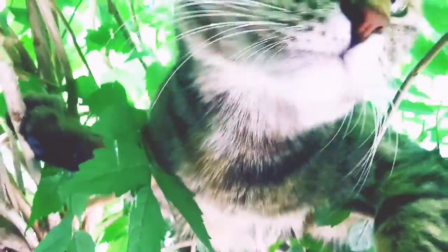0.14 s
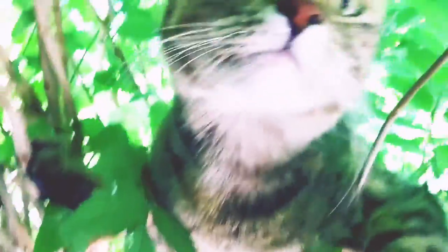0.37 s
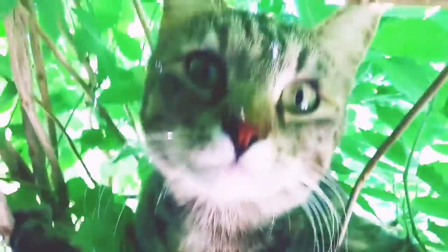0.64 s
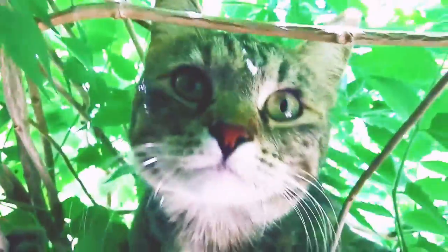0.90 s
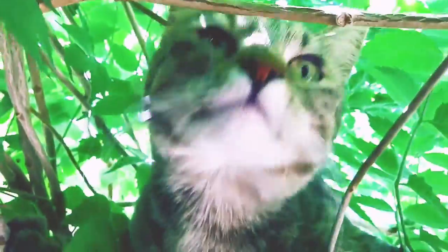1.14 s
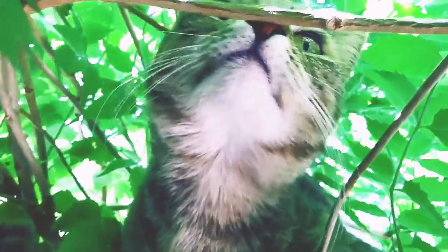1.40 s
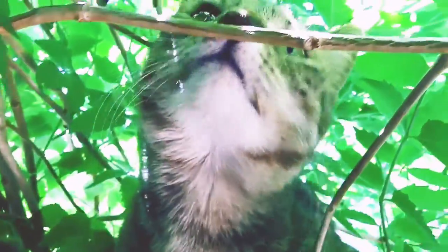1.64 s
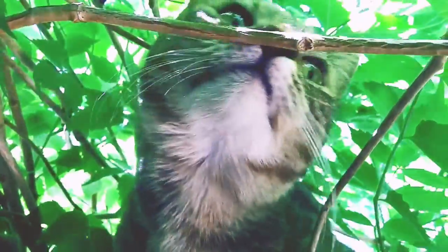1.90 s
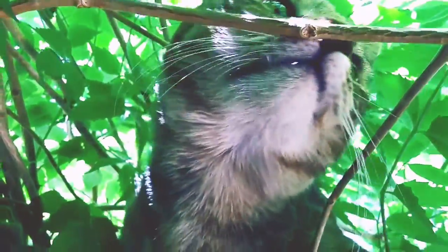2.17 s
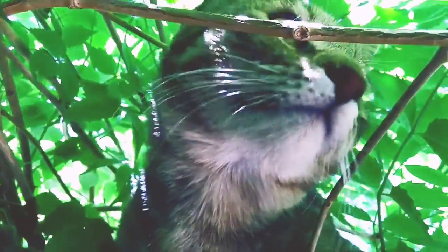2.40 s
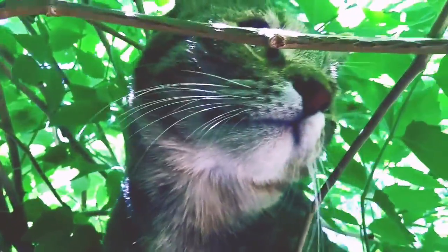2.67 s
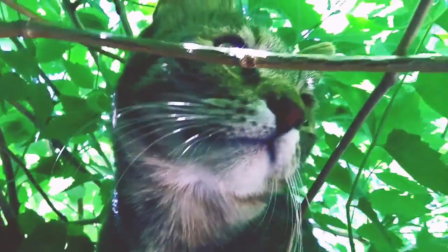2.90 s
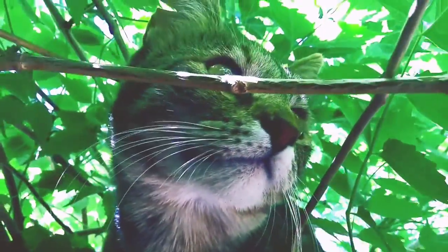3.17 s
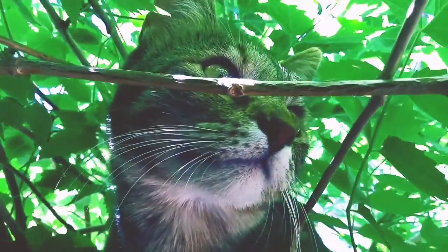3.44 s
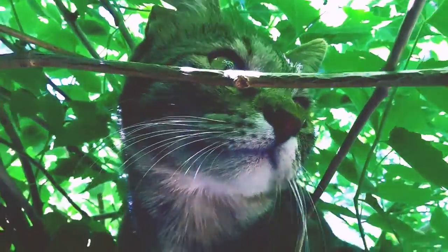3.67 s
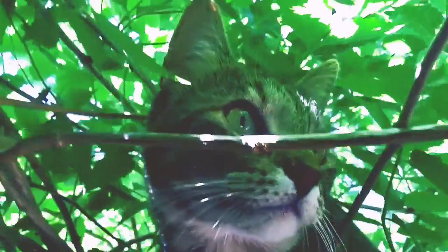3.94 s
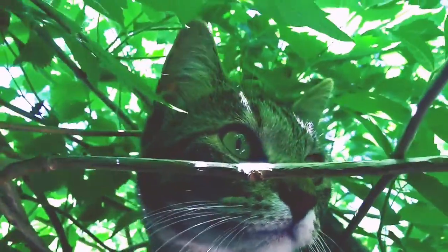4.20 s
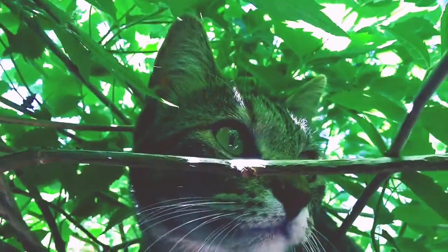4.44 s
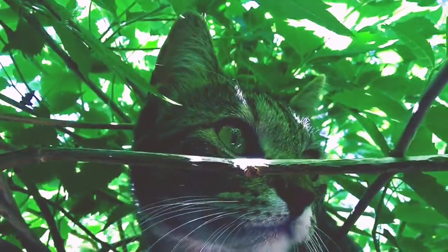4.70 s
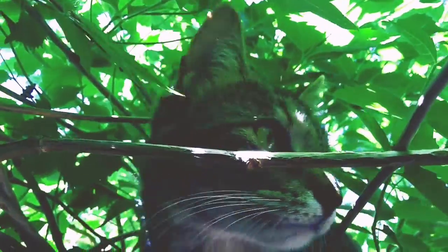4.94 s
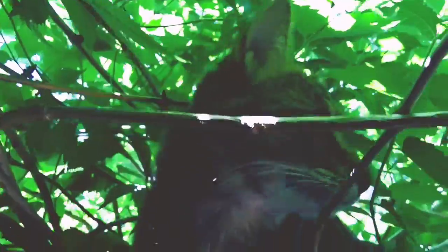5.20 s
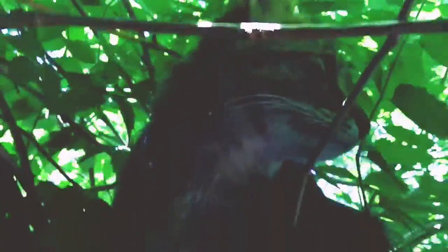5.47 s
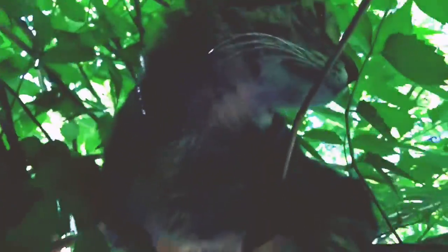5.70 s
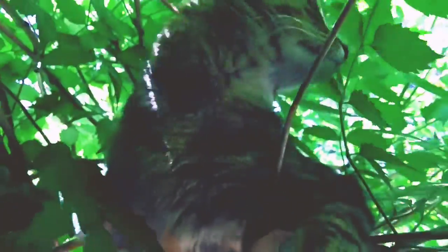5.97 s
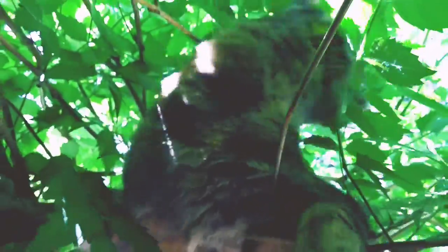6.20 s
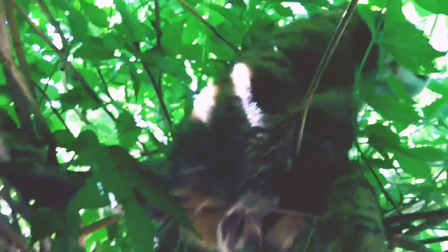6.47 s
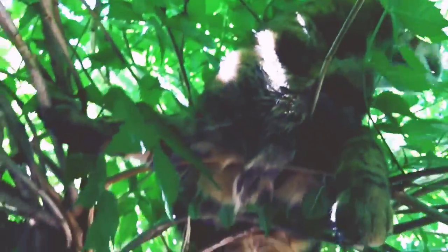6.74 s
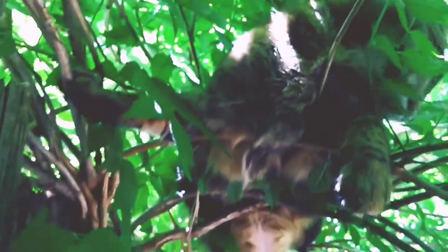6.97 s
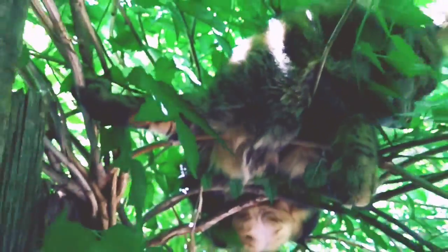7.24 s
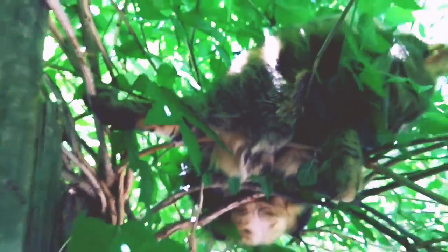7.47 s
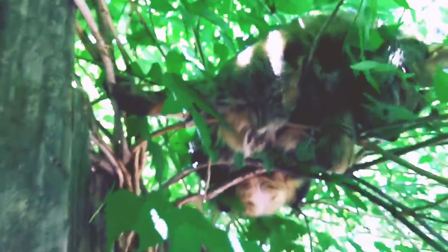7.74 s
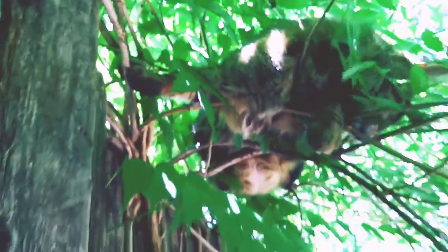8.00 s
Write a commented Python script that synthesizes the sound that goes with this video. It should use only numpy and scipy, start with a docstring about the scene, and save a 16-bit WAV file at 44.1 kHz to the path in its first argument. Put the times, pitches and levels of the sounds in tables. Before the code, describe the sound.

In a leafy garden with faint distant traffic, leaves rustle and a twig ticks close to the microphone as an animal shifts. A bird off to the left clucks, then whistles mellow low notes that flip upward like yodels and slide back, lightly echoed. Faint fuzzy chirps come from farther birds. The rustling grows after the song, and a very loud dry branch crack and splintering end it.

```python
"""A leafy garden over distant traffic: low engine tones waver under soft noise, and a thin insect buzz fades.
An animal shifts in a bush close by: noise makes leaves rustle, and ringing modes make twigs knock.
Soon a bird off to the left clucks and whistles: sines that flip up like a yodel and slide back, with echoes.
Fuzzy chirps, narrow bands of noise, come from far birds meanwhile. After the song the rustling grows.
At the end a dry branch cracks with hard knocks and goes on splintering in grainy noise."""
import sys
import numpy as np
from scipy import signal
from scipy.fft import rfft, irfft
from scipy.io import wavfile
from scipy.ndimage import uniform_filter1d

SR = 44100
rng = np.random.default_rng(int(sys.argv[2]) if len(sys.argv) > 2 else 0)


def transcribe(u):
    """Save the signal u as a 16-bit wav file named by the first command-line argument.

    u: samples, shape (n,) or (channels, n), limited to [-1, 1]; the rate is SR.
    q: integer samples, one column per channel.
    """
    v = np.clip(np.atleast_2d(u).T, -1, 1)
    q = np.round(v * 32767).astype(np.int16)
    wavfile.write(sys.argv[1], SR, q)


def natural_amplitude(level_db):
    """Convert a level in decibels to a linear amplitude factor, elementwise."""
    exponent = np.asarray(level_db, float) / 20
    return 10 ** exponent


N = 358091  # length in samples


def evened(x):
    """Scales a sound to an rms of 1."""
    return x / np.sqrt(np.mean(x ** 2) + 1e-20)


def read(points, hz):
    """Reads a table of (frequency, value) between its points, on a logarithmic frequency scale."""
    f, value = np.transpose(points)
    return np.interp(np.log(hz + 1), np.log(f + 1), value)


def curve(rows, t):
    """Joins the rows of a table by straight lines over time, one curve per column."""
    s, *columns = np.transpose(rows)
    return [np.interp(t, s, column) for column in columns]


def add(mix, s, sound):
    """Adds a short sound into the mix at s seconds, cut off where the mix ends."""
    part = mix[..., round(s * SR):][..., :sound.shape[-1]]
    part += sound[..., :part.shape[-1]]


def ports(left, right, lead, pan_db):
    """Two microphone ports: the right one hears later by lead samples, the left louder by pan_db."""
    n = np.arange(len(right))
    late_right = np.interp(n - lead, n, right)
    return np.array([left, late_right]) * natural_amplitude(np.array([[pan_db / 2], [-pan_db / 2]]))


def wander(rate_hz):
    """A random drift of rms 1: sines up to rate_hz with random phases, the slower ones stronger."""
    t = np.arange(N // 64 + 2) * 64 / SR
    slow = 0
    for f in np.geomspace(rate_hz / 20, rate_hz, 24):
        slow = slow + np.sin(2 * np.pi * (f * t + rng.random())) / np.sqrt(f)
    return np.interp(np.arange(N) / SR, t, evened(slow))


def noise(tone, patchy_db, size):
    """Noise of rms 1 in two ports: random short-time spectra, coloured by tone, with drifting patches."""
    # how alike the two ports are: hz, likeness (1 = same, 0 = unrelated, below 0 = opposed)
    likeness = [(60, 0.92), (180, 0.91), (550, 0.42), (1650, -0.18), (4970, 0.085), (15000, -0.054)]
    frames, hz = N * 4 // size + 5, np.fft.rfftfreq(size, 1 / SR)
    a, b, c, d, patches = rng.standard_normal((frames, len(hz), 5)).T
    patches = uniform_filter1d(patches, size=10, axis=0)
    patches = evened(uniform_filter1d(patches, size=10, axis=1))
    same = np.clip(read(likeness, hz), -1, 1)[:, None]
    left = a + 1j * b
    right = same * left + np.sqrt(1 - same ** 2) * (c + 1j * d)
    spectra = np.array([left, right]) * natural_amplitude(read(tone, hz)[:, None] + patchy_db * patches)
    return evened(signal.istft(spectra, nperseg=size, noverlap=size * 3 // 4)[1][:, :N])


def garden(x, t60, gap_s):
    """Walls and foliage scatter sound back: sparse taps of random sign that build over gap_s and die away."""
    taps = np.zeros((2, SR // 2))
    at = np.arange(0, SR // 2 - 20, 20) + rng.integers(0, 20, (2, SR // 40))
    np.put_along_axis(taps, at, rng.choice([-1., 1.], at.shape), 1)
    t = np.arange(SR // 2) / SR
    taps *= natural_amplitude(-60 * t / t60) * np.clip(t / gap_s, 0, 1)
    return signal.fftconvolve(x[None], taps / np.linalg.norm(taps[0]), axes=1)[:, :N]


def air():
    """The soft background: noise strongest in the bass, gently swelling."""
    # colour of the background: hz, level_db (per Hz, relative)
    air_tone = [(18, -34), (30, -23), (64, -11.5), (124, -10), (178, -9.5), (271, -10.5), (301, -11.5),
                (596, -16.5), (860, -16.5), (931, -19.5), (2460, -28), (3540, -29.5), (15800, -56)]
    level_db = -55.5 + 0.7 * wander(3)
    return natural_amplitude(level_db) * noise(air_tone, patchy_db=1.14, size=2048)


def engines():
    """Engines far away give low wavering tones at low orders of their firing rate, alike in both ports."""
    # a droning engine: start_s, pitch_hz, level_db (rms, before wavering)
    drone = [(0, 62.2, -67.5), (1.2, 51.3, -68), (1.5, 52, -102), (3.5, 55, -69), (3.9, 57.8, -57.5),
             (5.0, 60.6, -52.5), (5.45, 62.3, -55.5), (5.7, 55.6, -72)]
    # a higher hum: start_s, level_db (rms, before wavering)
    hum = [(0, -66.5), (1, -65), (2.1, -66), (3.1, -62), (4.6, -64.5), (8.12, -90)]
    # the order at half the pitch of the hum: start_s, level_db (rms)
    half_hum = [(1.6, -72), (2, -62), (3.3, -68), (4, -88)]
    t = np.arange(N) / SR
    drone_hz, drone_db = curve(drone, t)
    hum_db, half_db = curve(hum, t)[0], curve(half_hum, t)[0]
    hum_hz = 184 - 2.9 * t  # sags by 2.9 Hz each second
    hum_turns = np.cumsum(hum_hz * (1 + 0.012 * wander(13))) / SR
    drone_wave = np.sin(2 * np.pi * np.cumsum(drone_hz) / SR) * (t < drone[-1][0])
    out = natural_amplitude(drone_db + 0.95 * wander(3)) * drone_wave
    out += natural_amplitude(hum_db + 1.0 * wander(6.5)) * np.sin(2 * np.pi * hum_turns)
    out += natural_amplitude(half_db) * np.sin(np.pi * hum_turns) * (t < half_hum[-1][0])
    return np.sqrt(2) * out


def insect():
    """A thin, wavering tone, a narrow band of noise, that throbs with each wing stroke."""
    # loudness of the buzz: start_s, level_db (rms)
    buzz_levels = [(0, -75), (.5, -78.5), (1.4, -79), (1.7, -90.5), (4.6, -83.5), (5, -105)]
    pitch_hz, half_width_hz, strokes_hz = 9950, 160, 67
    t = np.arange(N) / SR
    edges_hz = [pitch_hz - half_width_hz, pitch_hz + half_width_hz]
    band = signal.butter(2, edges_hz, "band", fs=SR, output="sos")
    throb = (0.5 + 0.5 * np.cos(2 * np.pi * strokes_hz * (t - 0.138))) ** 2
    buzz = evened(signal.sosfilt(band, rng.standard_normal((2, N))) * throb)
    return buzz * natural_amplitude(curve(buzz_levels, t)[0]) * (t < buzz_levels[-1][0])


def far_birds():
    """Distance and foliage blur each chirp into a narrow band of noise around its gliding pitch."""
    # far chirps: start_s, length_s, first_hz, last_hz (glided towards), width_hz, level_db (rms, before fades)
    chirps = [(1.25, 0.092, 2480, 2500, 277, -65.5), (2.455, 0.27, 2570, 3600, 100.7, -67.5),
              (2.9, 0.19, 3600, 3530, 180, -69.5), (3.879, 0.12, 3350, 3650, 150, -71),
              (4.121, .12, 3370, 4140, 690, -63.5), (5.764, 0.08, 2790, 2740, 122, -61.5)]
    glide_s = 0.037
    out = np.zeros((2, N))
    for start, length, first_hz, last_hz, width_hz, db in chirps:
        t = np.arange(0, length, 1 / SR)
        hz = last_hz + (first_hz - last_hz) * np.exp(-t / glide_s)
        knots = 2 * width_hz * t  # the blur changes as fast as the band is wide
        a, b = ([np.interp(knots, np.arange(500), row) for row in rng.standard_normal((2, 500))]
                for _ in "ab")
        turn = 2 * np.pi * np.cumsum(hz) / SR
        chirp = evened(a * np.cos(turn) + b * np.sin(turn))
        add(out, start, natural_amplitude(db) * chirp * np.sin(np.pi * t / length) ** 0.29)
    return out


def leaves():
    """A fine hiss of rubbing leaves that flickers, with short swells of the same hiss on top."""
    # loudness of the hiss: start_s, level_db (rms, before flicker)
    hiss_levels = [(0, -65.5), (1.2, -67), (1.5, -73), (4, -72.5), (5.2, -73.5), (5.6, -62.5),
                   (6.05, -69.5), (6.6, -61), (7.5, -54.5), (7.85, -49.5), (8.12, -52)]
    # colour of the hiss: hz, level_db (relative)
    hiss_tone = [(700, 0), (1500, 1.5), (3000, 0), (5000, -3.5), (8000, -8.5), (11000, -7.5), (15000, -5),
                 (16000, -6.5)]
    # short swells of hiss, one of them a very brief treble tick: peak_s, level_db (rms at the peak),
    # tilt_db (treble tilt per octave above 2500 Hz), length_s (scale of the swell's length)
    hiss_swells = [(0.163, -57.5, 3, 0.0095), (0.491, -52, 1, 0.015), (0.79, -59, 4, 0.0089),
                   (0.905, -59, 6, 0.011), (1.059, -52.5, 6, 0.019), (1.69, -54.5, -8.5, 0.02),
                   (2.165, -55, -10, 0.021), (2.916, -72, 19, 0.043), (3.689, -64.5, -3, 0.024),
                   (3.735, -55, 13, 0.0027), (5.35, -60.5, 1.5, 0.092), (5.847, -66.5, 4, 0.088),
                   (6.565, -53, 10, 0.03), (6.825, -53.5, 2, 0.0058), (7.017, -56, 3, 0.0098),
                   (7.18, -52.5, 1.5, 0.022), (7.386, -50, -3, 0.0023), (7.464, -67, -1, 0.028)]
    t = np.arange(N) / SR
    hiss = noise(hiss_tone, patchy_db=2.0, size=256)
    flicker_db = 1.6 * wander(40)
    out = hiss * natural_amplitude(curve(hiss_levels, t)[0] + flicker_db)
    for s, db, tilt_db, length in hiss_swells:
        u = np.arange(-2 * length, 3 * length, 1 / SR) / length
        piece = hiss[:, round((s - 2 * length) * SR):][:, :len(u)]
        hz = np.fft.rfftfreq(len(u), 1 / SR)
        tilt = natural_amplitude(tilt_db * np.log2(np.maximum(hz, 2500) / 6000))
        piece = evened(irfft(rfft(piece) * tilt, len(u)))
        swell = np.exp(-np.where(u < 0, 1.38 * u, 0.9 * u) ** 2)  # rises faster than it falls
        add(out, s - 2 * length, natural_amplitude(db) * piece * swell)
    return out


def knocks():
    """Each blow starts the same modes, scaled by the size of the twig; a longer contact is duller."""
    # knocks of wood: start_s, level_db (peak, before pan and bass cut), pitch (factor on the modes),
    # ring (factor on their ringing time), pan_db (left minus right), contact_ms
    blows = [(0.0776, -25.5, 0.82, 0.21, 20, 0.37), (3.0329, -39.5, 1.73, 0.33, -16, 0.11),
             (4.2212, -28, 1.47, 0.19, -7, 0.39), (4.2415, -38, 0.69, 0.38, 14, 0.65),
             (4.2456, -35.5, 0.4, 3.6, -8, 1.5), (5.694, -38, 0.62, 0.12, 28, 0.88),
             (7.7916, -21, 0.72, 0.94, 9, 0.5), (7.841, -15.5, 0.87, 0.45, -12, 0.2),
             (7.8484, -19, 1.1, 0.7, -4, 0.5), (7.879, -30, 1.23, 1.4, 0.6, 0.4),
             (7.8935, 4, 0.987, 0.72, -1.3, 0.2), (7.898, -10.5, 0.97, 0.4, 16, 0.33),
             (7.9063, -23, 0.6, 1.4, 18, 0.31), (7.914, -15.5, 0.94, 0.45, -9, 1),
             (8.005, -22, 0.99, 0.36, -12, 0.28)]
    # what the wood rings with, before those factors: mode_hz, left_db, right_db, t60_s (time to fall 60 dB)
    modes = [(295, -37, -35, 0.067), (502, -34, -38, 0.01), (793, -21.5, -21.5, 0.17),
             (1060, 1, -14, 0.029), (1750, 0, -12, 0.0088), (2360, -32, 4.5, 0.0057),
             (3600, 2, -35, 0.0042), (5200, -7, -7, 0.0047)]
    lead = 6.3  # samples by which the left port hears first
    out, t = np.zeros((2, N)), np.arange(3000) / SR
    for s, db, pitch, ring, pan_db, contact_ms in blows:
        push = np.sin(np.pi * np.clip(t[:100] * 1000 / contact_ms, 0, 1)) ** 2
        ringing = np.zeros((2, len(t)))
        for mode_hz, left_db, right_db, t60 in modes:
            wave = -np.sin(2 * np.pi * pitch * mode_hz * t)
            ringing += natural_amplitude(np.array([[left_db], [right_db]]) - 60 * t / (ring * t60)) * wave
        left, right = (np.convolve(push, side) for side in ringing)
        peak = abs(left + right).max() / 2
        add(out, s, natural_amplitude(db) * ports(left, right, lead, pan_db) / peak)
    bass_cut = signal.butter(3, 240, "high", fs=SR, output="sos")  # thin wood radiates no bass
    free = signal.sosfilt(bass_cut, out)
    return free + natural_amplitude(-25.5) * garden(free.mean(0), 0.048, 0.004)


def splinters():
    """The broken branch goes on splintering: dense small snaps of uneven size through its colour."""
    # colour of the branch: hz, level_db (relative)
    branch_tone = [(120, -30), (250, 2.5), (400, -1.5), (900, 3.5), (1600, -5.5), (2900, -13), (3600, -38),
                   (9000, -57)]
    start_s, level_db, fade_db_per_s = 7.9, -31, 43.5
    burst_db, burst_s = 1, 0.0088  # a little louder at first
    t = np.arange(N) / SR
    snaps = rng.exponential(1, N) * (rng.random(N) < 600 / SR)  # about 600 a second
    grain = evened(1.9 + evened(uniform_filter1d(snaps, size=120)))
    u = np.maximum(t - start_s, 0)
    fading_db = level_db - fade_db_per_s * u + burst_db * np.exp(-u / burst_s)
    return noise(branch_tone, patchy_db=2.5, size=512) * grain * natural_amplitude(fading_db) * (u > 0)


def singer():
    """A sine rests low, flips up, sags and slides back, slightly unsteady; the garden echoes it."""
    # notes in the low register: start_s, end_s, low_hz, level_db (rms, before swell, yodels and carrying)
    notes = [(1.464, 1.702, 619, -38.5), (1.817, 1.97, 609, -39), (2.292, 2.425, 591, -41.5),
             (2.631, 3.051, 575.6, -43.5), (3.219, 3.598, 593.5, -44), (3.991, 4.752, 578, -43),
             (4.908, 5.236, 572, -42.5), (5.532, 6.235, 574.6, -44)]
    # yodels into the high register: flip_s, held_s, top_hz, sagged_hz, slide_s (time to slide back),
    # level_db (against the note)
    yodels = [(1.487, 0.19, 870, 744, 0.049, 1), (1.894, 0.038, 818, 814, 0.044, -0.5),
              (2.338, 0.08, 860, 711, .04, 0), (2.63, 0.065, 740, 777, .055, 1.5),
              (2.735, .13, 787, 715, 0.0405, 2), (2.998, 0.023, 750, 719, 0.046, -2),
              (3.233, 0.021, 760, 742, 0.013, 0), (3.476, 0.095, 795, 730, 0.037, 0),
              (4.033, .505, 790, 726, .068, -1), (4.688, 0.0218, 720, 720, .035, -2),
              (4.926, .13, 694, 654, 0.031, -1), (5.129, 0.09, 785, 684, .04, -5),
              (5.55, .505, 772, 716, .125, -1), (6.178, 0.01, 687, 660, 0.045, -11.5)]
    # short clucks in both registers: start_s, length_s, low_hz, high_hz (both at mid-cluck),
    # level_db (rms of the low tone at its peak)
    clucks = [(1.153, 0.098, 619, 768, -45.5), (2.132, 0.054, 578, 764, -50)]
    # how well each pitch carries: pitch_hz, gain_db
    carrying = [(580, 2), (630, 0.5), (670, 2), (708, -5), (738, 2.5), (768, -6), (805, -6), (850, -8)]
    flip_s, settle_s, settle_share = 0.0045, 0.0199, 0.3  # the last part of a flip is slower
    strain_s, strain_hz, strain_db = 0.012, 25, 2  # the low voice strains up and swells before a flip
    note_rise_s, note_fall_s = 0.0064, 0.029
    swell_db, swell_s = 18.5, 0.015  # a note starts softly and swells
    out, shake, flutter = np.zeros(N), wander(60), wander(40)
    for start, end, low_hz, note_db in notes:
        n = np.arange(round(start * SR), round(end * SR))
        t = n / SR
        hz, db = np.full((2, len(n)), [[low_hz], [note_db]], float)
        for flip, held, top_hz, sagged_hz, slide, yodel_db in yodels:
            u = t - flip
            after = np.maximum(u, 0)
            quick = (1 - settle_share) * np.exp(-after / flip_s)
            rise = 1 - quick - settle_share * np.exp(-after / settle_s)
            up = rise * np.clip(1 - (u - held) / slide, 0, 1)
            strain = np.exp(-abs(u) / np.where(u < 0, strain_s, flip_s))
            high_hz = top_hz + (sagged_hz - top_hz) * np.clip(u / held, 0, 1)
            hz = hz + up * (high_hz - low_hz) + strain_hz * strain
            db = db + rise * (up > 0) * yodel_db + strain_db * strain
        hz, db = uniform_filter1d([hz, db], size=180, axis=1)  # muscles round every corner
        tone = np.sin(2 * np.pi * np.cumsum(hz * (1 + 0.0025 * shake[n])) / SR)
        edges = np.clip(np.minimum((t - start) / note_rise_s, (end - t) / note_fall_s), 0, 1)
        edges *= natural_amplitude(-swell_db * np.exp(-(t - start) / swell_s))
        out[n] += np.sqrt(2) * natural_amplitude(db + read(carrying, hz) + 0.58 * flutter[n]) * tone * edges
    for start, length, low_hz, high_hz, db in clucks:
        t = np.arange(0, length, 1 / SR)
        arch = np.sin(np.pi * t / length)
        bent = np.cumsum(1 - 0.09 * (1 - arch) ** 2) / SR  # the pitch bends up and back
        both = np.sin(2 * np.pi * low_hz * bent) + natural_amplitude(-3) * np.sin(2 * np.pi * high_hz * bent)
        add(out, start, np.sqrt(2) * natural_amplitude(db) * both * arch ** 1.3)
    direct = ports(out, out, 14.7, 0)  # the left port hears first, equally loud
    return direct + natural_amplitude(-10) * garden(out, 0.36, 0.013)


def scene():
    """Adds the background, the bush and the singing bird."""
    background = air() + engines() + insect() + far_birds()
    return background + leaves() + knocks() + splinters() + singer()


def roll_off(x):
    """The treble ends steeply here."""
    return signal.sosfilt(signal.butter(12, 16490, fs=SR, output="sos"), x)


def record(dry):
    """A small microphone limits the band; the converter clips whatever exceeds full scale."""
    low_hz, high_hz = 48, 15800
    low_cut = signal.sosfilt(signal.butter(3, low_hz, "high", fs=SR, output="sos"), dry)
    edge = signal.firwin(511, high_hz, window=("kaiser", 9), fs=SR)
    limited = signal.oaconvolve(low_cut, edge[None], "same")
    return roll_off(np.clip(limited, -1, 1))


dry = scene()
out = record(dry)
transcribe(out)
```